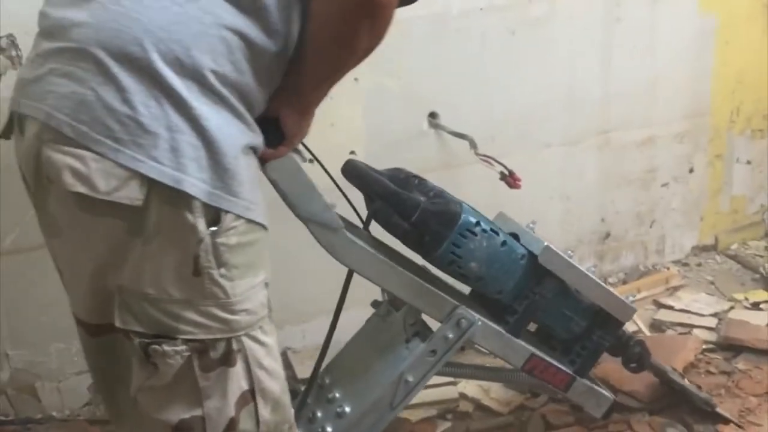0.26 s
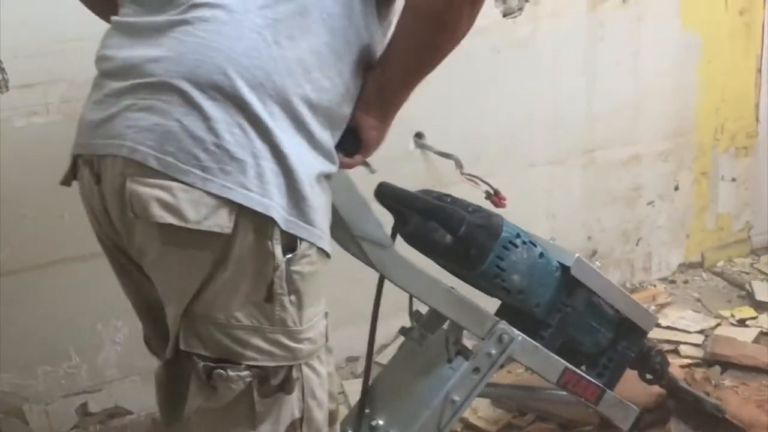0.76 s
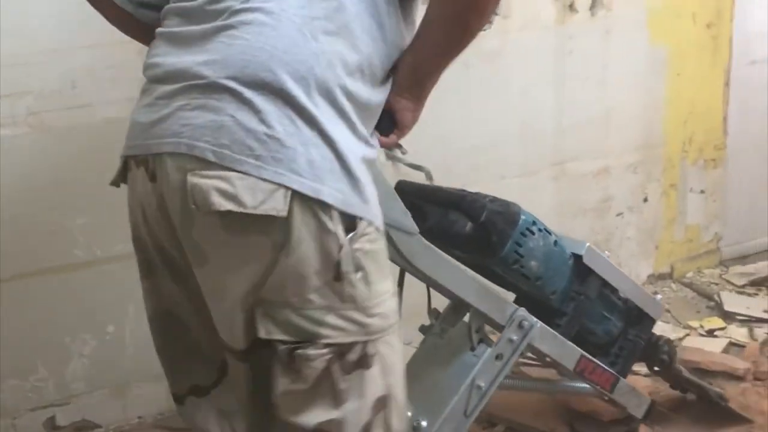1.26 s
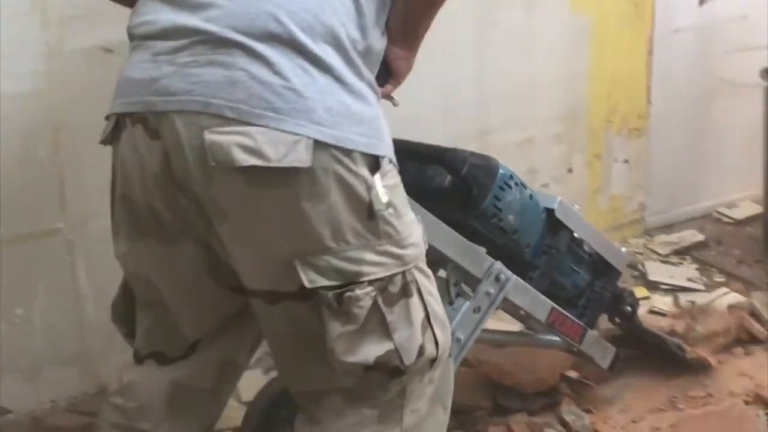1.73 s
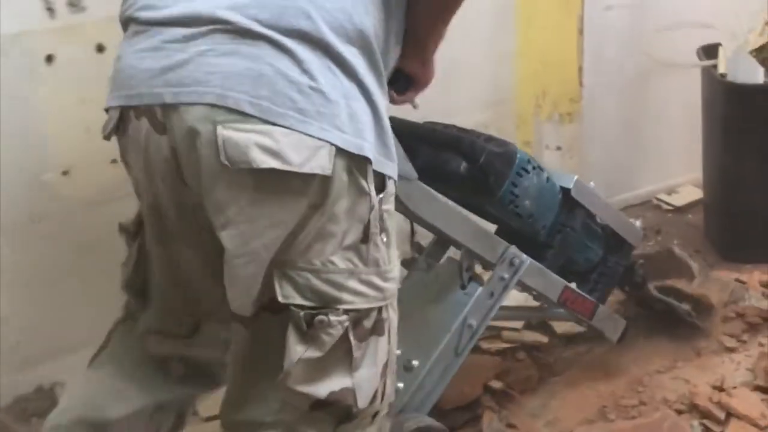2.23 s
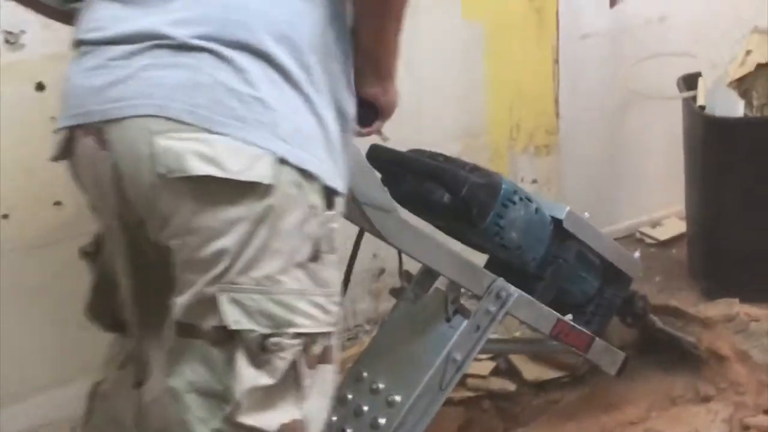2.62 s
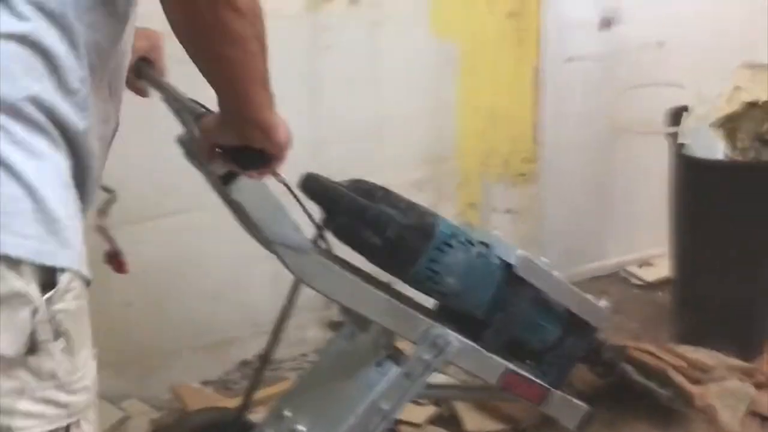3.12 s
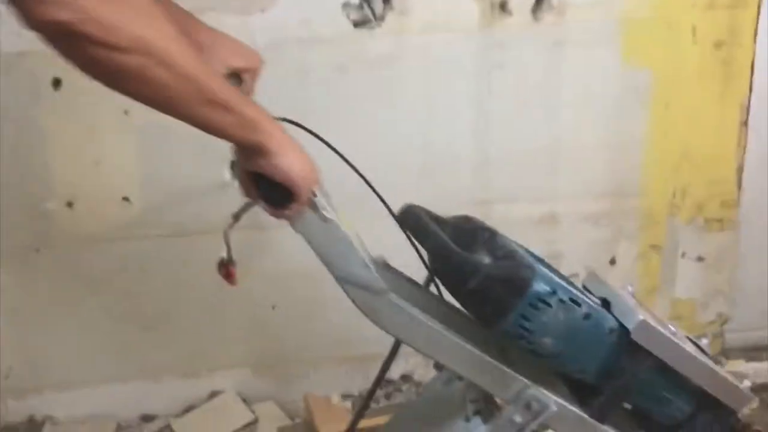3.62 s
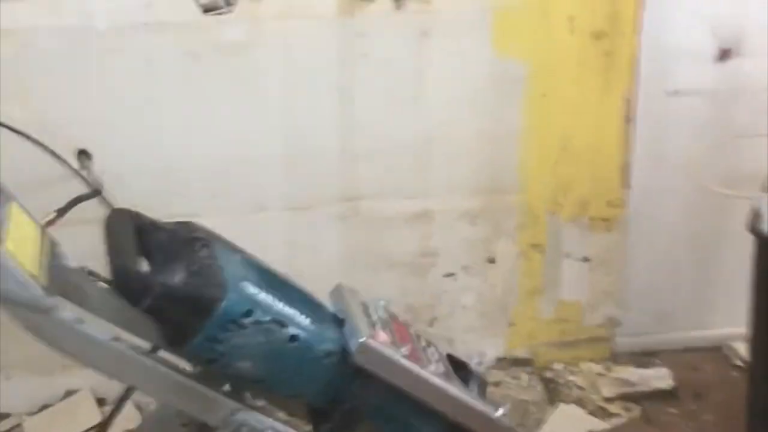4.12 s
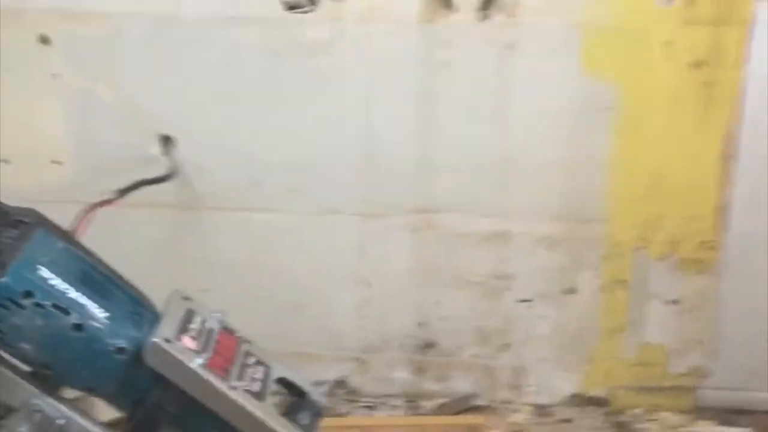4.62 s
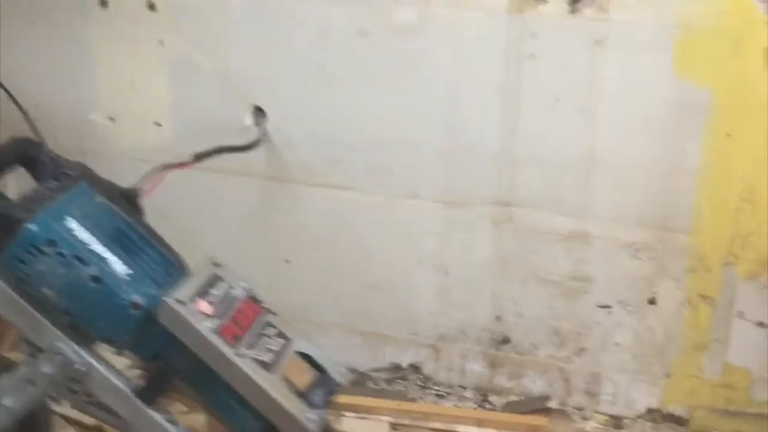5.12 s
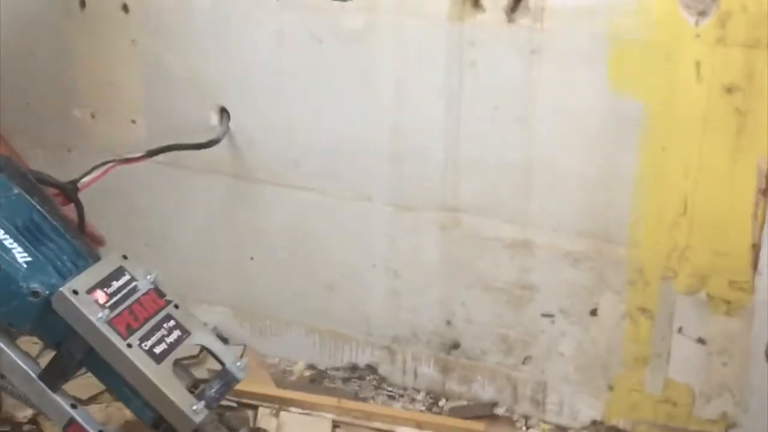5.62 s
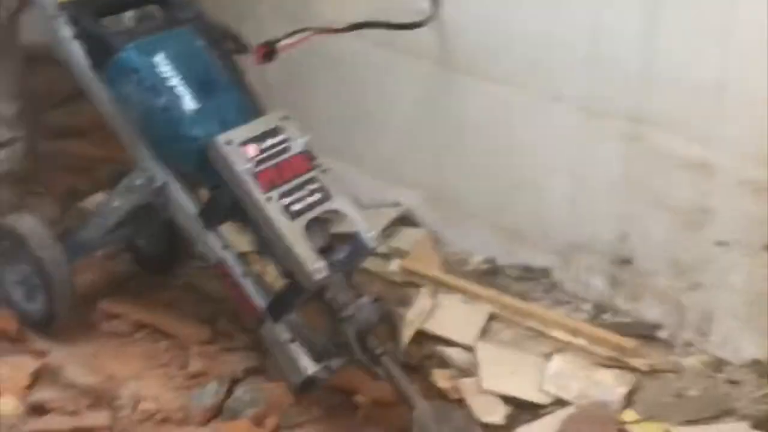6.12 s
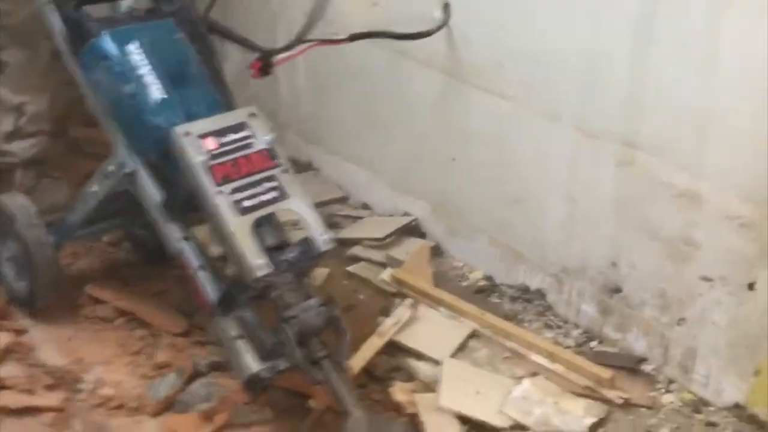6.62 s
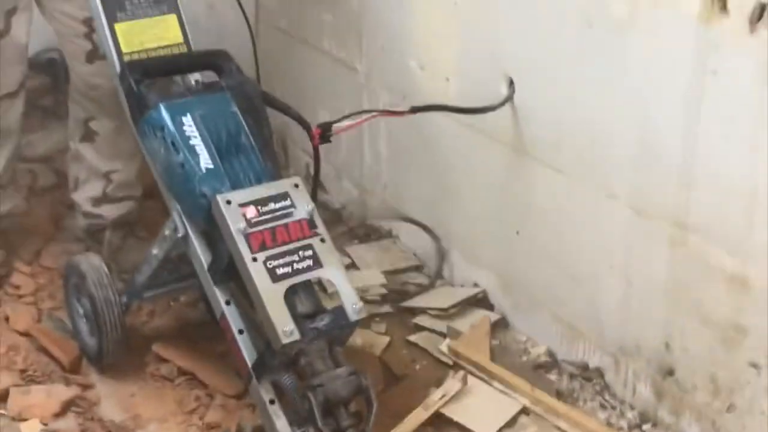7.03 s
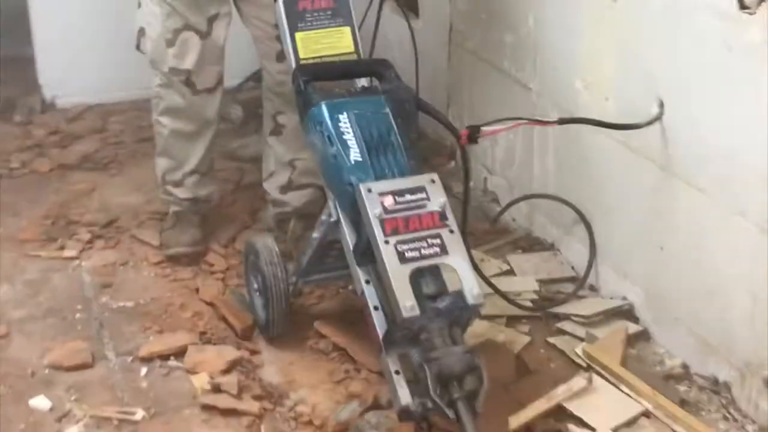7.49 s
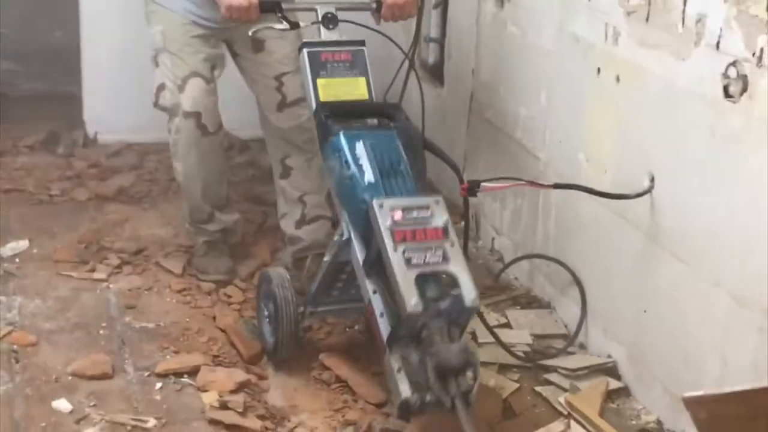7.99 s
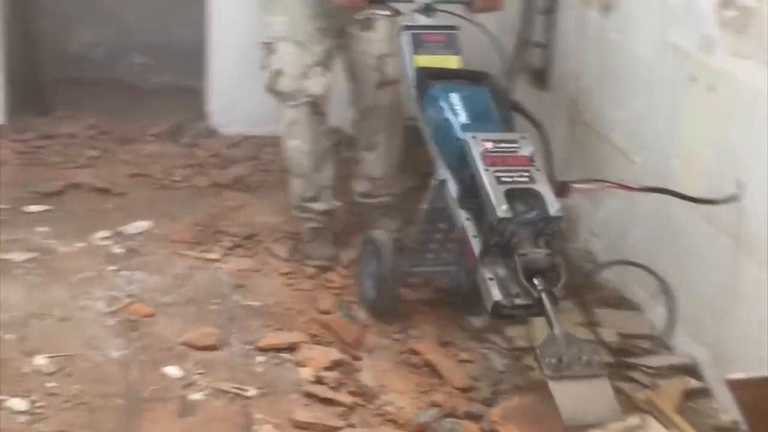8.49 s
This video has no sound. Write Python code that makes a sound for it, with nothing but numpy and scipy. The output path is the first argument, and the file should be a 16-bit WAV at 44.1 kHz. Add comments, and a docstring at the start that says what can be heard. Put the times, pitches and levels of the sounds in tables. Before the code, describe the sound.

Close, bright and echoing in a bare room, an electric demolition hammer on a cart is already running, its loose bit rattling at about 24 strokes a second under a high whine. Near 0.6 s a hard blow and splitting tile begin a hammering burst to 1.2 s; a brief wheel rumble passes beneath. Further bursts come at 1.3-1.5, 1.8-2.0, 2.1-2.9 and 3.1-3.3 s, sharp cracks with grit and slab knocks, the throbbing motor filling the gaps. Dull thumps fall at 1.9 and around 2.3-2.4 s. After a motor-only lull, loose rattle swells from 3.6 s to a steady metallic clatter by 4.3 s, with clanks mostly between 4.5 and 5.6 s, then 6.5 and 6.9 s. From 5.9 s scraping and blade ringing strengthen on bare slab. Whine and stroke rate sink slightly; faint wheels rumble from 7.7 s to the end, still running.

```python
"""A bare, ringing room, where an electric demolition hammer on a cart lifts floor tile.
While the chisel bites, about 24 blows a second excite the chisel and the slab; between these bursts the motor runs on.
When the blade rides loose over the rubble, each stroke throws the bit: it rattles, and cart, shank and blade resonate.
The motor's whine is locked to the crank and slowly sinks with it; a few dull thumps and a low wheel rumble pass.
Noise, contact grains and sinusoids pass through resonant bodies and, for most sources, decaying echoes."""
import sys
import numpy as np
from scipy import signal
from scipy.fft import rfft, irfft, next_fast_len
from scipy.io import wavfile
from scipy.ndimage import uniform_filter1d, minimum_filter1d

SR = 44100
rng = np.random.default_rng(int(sys.argv[2]) if len(sys.argv) > 2 else 0)


def waveform_to_disk(signal):
    """Save audio, clipped to [-1, 1], as 16-bit WAV at the path in sys.argv[1]."""
    frames = np.transpose(np.atleast_2d(signal))
    scaled = np.clip(frames, -1, 1) * 32767
    samples = np.round(scaled).astype(np.int16)
    wavfile.write(sys.argv[1], SR, samples)


N = 385875
TIME = np.arange(N) / SR   # s
SIZE = next_fast_len(N + SR)   # transform length, samples
HZ = np.maximum(np.arange(SIZE // 2 + 1) * SR / SIZE, 1)


# speed of the crank, which slackens as the blade is pushed along: t/s, strokes per second/Hz
STROKE_RATE = [(0.0, 23.72), (0.6, 23.62), (4.1, 24.02), (8.75, 23.19)]


def crank():
    """Phase is the integral of frequency: turns of the crank, and the time of each full turn in s."""
    turns = np.cumsum(curve(STROKE_RATE)) / SR
    strokes = TIME[1:][np.diff(np.floor(turns)) > 0]
    return turns, strokes


# bursts in which the chisel bites: first blow t/s, last blow t/s, lengthening of each stroke/s,
# relative crack level/dB, relative knock level/dB
BURSTS = [(0.618, 1.176, -0.0018, -15, -29), (1.341, 1.477, 0.0037, -11.5, -28),
          (1.758, 1.976, 0.0016, -13.3, -30.5), (2.088, 2.921, 0.00002, -15.5, -29.5),
          (3.118, 3.338, 0.0019, -15, -29.5)]
# the chisel seats itself over the first strokes of a burst and is eased off over the last
SEATING_DB, SEATING_STROKES, EASING_DB, EASING_STROKES = -4, 0.34, -4.5, 0.36
CRACK_UNEVEN_DB, KNOCK_UNEVEN_DB = 0.05, 1.5


def blows():
    """Periodic impact, one blow per stroke, weaker at both ends of a burst: rows (t/s, crack/dB, knock/dB)."""
    rows = []
    for first, last, slowing_s, crack_db, knock_db in BURSTS:
        rate = np.interp(first, *np.transpose(STROKE_RATE))
        gaps = int(round((last - first) * rate))
        k = np.arange(gaps + 1)
        s = np.linspace(first, last, gaps + 1) - slowing_s * k * (gaps - k) / 2
        seating_db = SEATING_DB * np.exp(-k / SEATING_STROKES)
        easing_db = EASING_DB * np.exp((k - gaps) / EASING_STROKES)
        force_db = seating_db + easing_db
        chance = rng.standard_normal((len(k), 2))
        cracks_db = crack_db + force_db + CRACK_UNEVEN_DB * chance[:, 0]
        knocks_db = knock_db + force_db + KNOCK_UNEVEN_DB * chance[:, 1]
        rows.append(np.transpose([s, cracks_db, knocks_db]))
    return np.vstack(rows)


# tile splits and crumbles under the blade: start t/s, end t/s, relative level/dB
SPLITS = [(0.614, 0.782, -15), (0.842, 1.307, -33), (1.705, 1.713, -27.5)]
SPLIT_RISE_DB_PER_S, SPLIT_FALL_DB_PER_S = 4000, 430
# broad spectra of the crack and of the slab: f/Hz, relative level/dB
CRACK_COLOUR = [(300, -39), (900, -16), (1500, -4.5), (2200, -3.5), (3200, 0), (4300, -1.5), (5700, 0),
                (7000, -4), (8800, -9), (10500, -11), (13000, -10), (15500, -17.5)]
SLAB_COLOUR = [(30, -29), (60, -19), (110, -20.5), (200, -11), (300, -3), (430, -11.5), (620, 3), (1000, 4),
               (1250, -9.5), (2000, -30)]
# resonances of the chisel pressed into the floor: f/Hz, width/Hz, lift/dB
PRESSED_CHISEL = [(1313, 46, 7.5), (1890, 120, 4), (3110, 280, 3.5), (4290, 200, 3.5), (4630, 170, 5.5),
                  (7810, 240, 6), (9650, 280, 7.5), (11440, 180, 9.5)]
# modes of the shank, a little higher when pressed into the floor: f/Hz, width/Hz, relative level/dB
PRESSED_SHANK = [(4800, 100, -8.5), (4780, 32, -4), (4880, 16, -13), (7520, 49, -16)]


def biting(tails):
    """Impact excitation: each blow is a crack and a spray of grit in the chisel, and a knock in the slab."""
    s, steel_db, slab_db = blows().T
    crack = from_db(8) * decays(s, from_db(steel_db), t60=0.029, attack_s=0.0013)
    crack = crack * rng.standard_normal(N)
    crack = signal.lfilter([1, -.4], [1], crack)   # tilted towards the treble
    grit = from_db(3.0) * decays(s, from_db(steel_db), t60=0.086, attack_s=0.00059)
    grit = grit * grains(per_s=9000, spread_db=4)
    crumble = swells(SPLITS, SPLIT_RISE_DB_PER_S, SPLIT_FALL_DB_PER_S) * grains(per_s=12000, spread_db=2.5)
    knock = from_db(8.5) * decays(s, from_db(slab_db), t60=0.081, attack_s=0.0043)
    knock = knock * rng.standard_normal(N)
    steel = in_room(body(crack + grit + crumble, CRACK_COLOUR, PRESSED_CHISEL), tails, wet_db=0.5)
    shank = in_room(ringing(crack + grit + 0.29 * crumble, PRESSED_SHANK), tails, wet_db=6.0)
    slab = in_room(body(knock + from_db(-11.5) * crumble, SLAB_COLOUR), tails, wet_db=3.0)
    return steel + from_db(-10.5) * shank + slab


def chatter(strokes, rebound_s, t60, loose_db, uneven_db):
    """Repeated impact: each stroke throws the loose bit forward; it rebounds and jitters until the next."""
    chance = rng.standard_normal((len(strokes), 4))
    hit_s = strokes + 0.0014 * chance[:, 0]
    hits = decays(hit_s, from_db(uneven_db * chance[:, 1]), t60, attack_s=0.0022)
    rebound_at = strokes + rebound_s + 0.0019 * chance[:, 2]
    rebounds = decays(rebound_at, from_db(-6.5 + uneven_db * chance[:, 3]), t60, attack_s=0.0019)
    jitter = grains(per_s=1800, spread_db=2.5)
    jitter = signal.lfilter([.6], [1, -.4], jitter)   # light touches are duller than strokes
    return (hits + rebounds) * grains(per_s=8000, spread_db=2.5) + from_db(loose_db) * jitter


# how hard the loose bit is shaken over the rubble: t/s, relative level/dB
SHAKING = [(0.0, 0), (0.3, 0), (0.6, 1.5), (3.6, -14), (3.9, -5.5), (4.2, -0.95), (4.9, 0.56), (6.4, 0.03),
           (8.75, -0.5)]
# a lone blow on the floor at 0.569 s, then the bit clanks hard against its holder: t/s, relative level/dB
CLANKS = [(0.569, 3), (4.5163, -6), (4.6399, -12), (4.6874, 0.5), (5.1415, -3), (5.3966, -1), (5.5232, -2),
          (5.5699, 0), (6.4992, -2), (6.9231, -5)]
# the blade skips and rings out: t/s, relative level/dB
BLADE_RINGS = [(3.92, -29.5), (4.13, -36), (4.36, -44), (5.75, -26.5), (5.99, -25.5), (6.23, -23.5),
               (6.52, -20.5), (7.19, -24.5), (7.61, -23), (7.84, -20.5), (8.09, -25), (8.36, -21.5),
               (8.54, -22)]
RING_RISE_DB_PER_S, RING_HOLD_S, RING_FALL_DB_PER_S = 246, 0.014, 104
# broad spectra of the rattling bit and of the cart: f/Hz, relative level/dB
RATTLE_COLOUR = [(500, -30), (1100, -6.5), (1600, -3.5), (2400, -1.5), (3300, 3.5), (3900, -1.5),
                 (4500, 3.5), (5000, -3), (6000, -1.5), (7300, -10.5), (8700, -5), (10500, -15),
                 (11800, -11), (15500, -22.5)]
CART_COLOUR = [(30, -18), (50, -16), (100, -14.5), (170, -12), (330, -7.5), (480, -4), (680, 1), (900, 2.5),
               (1200, -8.5), (2000, -26)]
# resonances of the loose chisel and of the cart's frame: f/Hz, width/Hz, lift/dB
LOOSE_CHISEL = [(1958, 36, 6.4), (2220, 54, 3.8), (3135, 37, 5.6), (7740, 110, 4.4), (8380, 90, 2.6)]
CART_FRAME = [(61, 4.9, 8), (202, 9.2, 2.7), (245, 7.5, 1.6), (357, 26, 4.7), (835, 17, 4.7)]
# modes of the shank, the blade and its edge: f/Hz, width/Hz, relative level/dB
SHANK = [(4620, 17, -2.3), (4634, 12, 0.84)]
BLADE = [(1355, 9.4, 5.5)]
EDGE = [(1043, 57, -3), (1106, 13.6, 9.5), (1200, 210, -5), (1289, 35, 6)]
# levels at 0 dB of shaking
RATTLE_DB, CART_DB, SHANK_DB, BLADE_DB = -22.0, -32, -32.5, -36
CART_FOLLOWS = 1.2   # dB of cart clatter per dB of shaking
# the edge scrapes softly over rubble, then reaches bare slab, where the blade rings more
SLAB_REACHED_S, SLAB_ONSET_S = 5.87, 0.12
EDGE_ON_RUBBLE_DB, EDGE_ON_SLAB_DB, BLADE_ON_SLAB_LIFT_DB = -36, -27.5, 4.5


def riding(strokes, tails):
    """Forced vibration: the loose bit rattles, shakes the cart and keeps its shank and blade ringing."""
    shaking_db = curve(SHAKING)
    shake = chatter(strokes, rebound_s=0.02086, t60=0.054, loose_db=-9.5, uneven_db=1.5)
    clank_s, clank_db = np.transpose(CLANKS)
    clanks = from_db(-11.5) * decays(clank_s, from_db(clank_db), t60=.025) * rng.standard_normal(N)
    on_slab = np.clip((TIME - SLAB_REACHED_S) / SLAB_ONSET_S, 0, 1)

    rattle = from_db(RATTLE_DB + shaking_db) * evened(shake, window_s=0.305)
    bit = in_room(body(rattle + clanks, RATTLE_COLOUR, LOOSE_CHISEL), tails, wet_db=-0.4)

    cart = in_room(body(shake, CART_COLOUR, CART_FRAME), tails, wet_db=3)
    cart = from_db(CART_DB + CART_FOLLOWS * shaking_db) * evened(cart, window_s=0.071)

    shank = in_room(ringing(shake, SHANK), tails, wet_db=3.5)
    shank = from_db(SHANK_DB + shaking_db) * evened(shank, window_s=0.39)

    skips = [(at, at + RING_HOLD_S, db) for at, db in BLADE_RINGS]
    rings = swells(skips, RING_RISE_DB_PER_S, RING_FALL_DB_PER_S)
    blade_db = BLADE_DB + BLADE_ON_SLAB_LIFT_DB * on_slab + shaking_db
    blade = in_room(ringing(shake, BLADE), tails, wet_db=-3.5)
    blade = np.hypot(from_db(blade_db), rings) * evened(blade, window_s=0.075)

    edge_db = EDGE_ON_RUBBLE_DB * (1 - on_slab) + EDGE_ON_SLAB_DB * on_slab
    edge = in_room(ringing(shake, EDGE), tails, wet_db=-0.5)
    edge = from_db(edge_db + shaking_db) * evened(edge, window_s=0.16)
    return lifted() * (bit + cart + shank + blade + edge)


def lifted():
    """Contact condition: 1 while the blade rides loose, 0 while the chisel is pressed in."""
    return np.interp(TIME, [.58, .8, 3.45, 3.85], [1, 0, 0, 1])


# broad spectrum of fan and gears: f/Hz, relative level/dB
MOTOR_COLOUR = [(30, -22), (60, -23), (110, -29), (250, -11), (480, -7), (700, -1), (1300, -0.5),
                (1700, -5), (3300, 2), (4800, -3.5), (7000, -3.5), (9500, -9.5), (15500, -25)]
# hums of the drive, and a low hum of the cart near 63 Hz: f/stroke rate, relative level/dB
HUMS = [(2.66, -58.5), (5, -60.5), (7, -57), (9, -62), (11, -52.5)]
# gain of the hums, strong at first, faint in the middle, strong again towards the end: t/s, level/dB
HUM_LEVEL = [(1.1, 5), (1.6, -9), (3.6, -12), (4.3, -7), (6.5, 3.5), (8.5, 2.5)]
# whine of the motor, with side tones from the crank: f/stroke rate, relative level/dB
WHINE = [(194, -6), (195, 1.5), (196, -8.5)]
# level of the whine before the shaking is added, heard while the tool rides free: t/s, level/dB
WHINE_LEVEL = [(0.05, -22.5), (0.28, -33.5), (0.5, -29), (4.0, -33), (4.7, -28), (5.35, -28), (5.65, -21),
               (5.9, -33), (7.0, -29.5), (8.75, -38)]


def motor(turns, tails, waver_db=2.5, waver_cycles=0.12):
    """Amplitude modulation and frequency ratios: the rush throbs with the crank; hums and whine track it."""
    throb = 1 + 0.52 * np.cos(2 * np.pi * turns)
    rush = grains(per_s=5000, spread_db=2.0) * throb
    gears = in_room(body(rush, MOTOR_COLOUR, [(1340, 40, 3.7), (4740, 150, 12.0)]), tails, wet_db=2.5)
    hum = sum(from_db(db) * np.sin(2 * np.pi * (order * turns + rng.random())) for order, db in HUMS)
    whine = np.zeros(N)
    for order, db in WHINE:
        gain = from_db(db + waver_db * drift(per_s=3.2))
        cycles = round(order) * turns + waver_cycles * drift(per_s=3.2)
        whine += gain * np.sin(2 * np.pi * cycles)
    whine_db = curve(WHINE_LEVEL) + curve(SHAKING)
    whine = lifted() * from_db(whine_db) * rms_one(whine)
    return from_db(-34) * gears + from_db(curve(HUM_LEVEL)) * hum + whine


# dull thumps: t/s, nominal peak level/dB
THUMPS = [(1.886, -25), (2.256, -25), (2.298, -23), (2.424, -19.5)]


def thumps(start_hz=720, end_hz=45, fall_s=0.0025, t60=0.075):
    """Damped oscillation of falling frequency: each thump is a quick swing that slows as it dies."""
    out = np.zeros(N)
    for s, peak_db in THUMPS:
        age = np.maximum(TIME - s, 0)
        cycles = end_hz * age + (start_hz - end_hz) * fall_s * (1 - np.exp(-age / fall_s))
        swing = np.minimum(age / .001, 1) * from_db(-60 * np.minimum(age / t60, 3))
        out += from_db(peak_db) * swing * np.sin(2 * np.pi * cycles)
    return out


# the cart is shoved forward: start t/s, end t/s, level/dB
SHOVES = [(0.76, 0.838, -47), (7.7, 8.75, -53.5)]
SHOVE_RISE_DB_PER_S, SHOVE_FALL_DB_PER_S, RUMBLE_HZ, RUMBLE_WIDTH_HZ = 150, 120, 56, 28


def wheels():
    """Rolling noise: a resonance driven at random rumbles for as long as each shove lasts."""
    rumble = through(rng.standard_normal(N), resonance(RUMBLE_HZ, RUMBLE_WIDTH_HZ))
    return swells(SHOVES, SHOVE_RISE_DB_PER_S, SHOVE_FALL_DB_PER_S) * rumble


# reverberation time of the room: f/Hz, t60/s
ROOM_T60 = [(100, 1), (500, 0.67), (2000, 0.77), (5000, 0.68), (10000, 0.48), (16000, 0.34)]


def room_tails(first_echo_s=.004, count=17):
    """Reverberant decay off bare plaster, shortest in the high treble; one pattern for each spot of the tool."""
    t, tails = TIME[:SR // 2], 0
    edges = np.geomspace(30, 17000, 12)   # Hz
    for low, high in zip(edges, edges[1:]):
        band_pass = signal.butter(2, [low, high], "band", fs=SR, output="sos")
        band = signal.sosfilt(band_pass, rng.standard_normal((count, len(t))))
        tails = tails + band * from_db(-60 * t / at_hz(ROOM_T60, np.sqrt(low * high)))
    tails = tails * (t > first_echo_s)
    return tails / np.sqrt(np.sum(tails ** 2, axis=1, keepdims=True))


def in_room(x, tails, wet_db, size=6144):
    """Convolution with the room: echoes change pattern as the tool moves and join the direct sound by power."""
    echoes, wet, lead = np.zeros(N + 2 * SR), from_db(wet_db), 2 * size
    running = np.pad(x, (lead, 0), "reflect")   # the room is already ringing at the start
    span = next_fast_len(size + tails.shape[1])
    spots = rfft(tails, span)
    for k, i in enumerate(range(0, len(running), size // 2)):
        piece = running[i:i + size]
        piece = piece * np.sin(np.pi * np.arange(len(piece)) / size)
        echoes[i:i + span] += irfft(rfft(piece, span) * spots[k % len(spots)], span)
    return (x + wet * echoes[lead:lead + N]) / np.sqrt(1 + wet ** 2)


def body(x, colour, modes=()):
    """Source and filter: a broad colour that falls away past its ends, lifted at each resonance."""
    ends = (1 + (colour[0][0] / HZ) ** 2) * (1 + (HZ / colour[-1][0] / 2) ** 4)
    response = from_db(at_hz(colour, HZ)) / ends
    for hz, width, lift_db in modes:
        response = response * (1 + (from_db(lift_db) - 1) * resonance(hz, width))
    return through(x, response)


def ringing(x, modes):
    """Modal superposition: steel struck by x rings in its modes, with alternating sign."""
    response = 0
    for k, (hz, width, db) in enumerate(modes):
        response = response + from_db(db) * resonance(hz, width) * (-1) ** k
    return through(x, response)


def resonance(hz, width):
    """Damped harmonic oscillator: the response of one mode, 1 on top."""
    return 1 / (1 + 1j * (HZ ** 2 - hz ** 2) / (HZ * width))


def through(x, response):
    """Linear filtering by a response that keeps the power of white noise."""
    power = np.mean(abs(response) ** 2)
    return irfft(rfft(x, SIZE) * response / np.sqrt(power), SIZE)[:N]


def grains(per_s, spread_db):
    """Random point process: tiny contacts at random moments, of uneven size, at unit rms."""
    sizes = from_db(spread_db * np.clip(rng.standard_normal(N), -2, 2)) * rng.choice([-1, 1], N)
    return rms_one(sizes * (rng.random(N) < per_s / SR))


def decays(times, gains, t60, attack_s=0.00088):
    """Exponential energy decay: an envelope that swells at each contact and dies away."""
    kicks = np.zeros(N)
    samples = np.clip((np.asarray(times) * SR).astype(int), 0, N - 1)
    np.add.at(kicks, samples, np.square(gains))
    power = signal.lfilter([1], [1, -from_db(-60 / (t60 * SR)) ** 2], kicks + 1e-18)
    lag = np.exp(-1 / (attack_s * SR))
    return np.sqrt(signal.lfilter([1 - lag], [1, -lag], power))


def swells(rows, rise_db_per_s, fall_db_per_s):
    """Attack, hold and release, straight in level: the summed gain of rows (start t/s, end t/s, level/dB)."""
    total = np.zeros(N)
    for start, end, db in rows:
        below_db = rise_db_per_s * np.maximum(start - TIME, 0) + fall_db_per_s * np.maximum(TIME - end, 0)
        total += from_db(db - np.minimum(below_db, 120))
    return total


def drift(per_s):
    """Low-passed noise: a slow wander of unit rms."""
    knots = rng.standard_normal(int(N / SR * 40) + 400)   # 40 a second
    r = np.exp(-2 * np.pi * per_s / 40)
    slow = rms_one(signal.lfilter([1], [1, -2 * r, r * r], knots)[300:])
    return np.interp(TIME * 40, np.arange(len(slow)), slow)


def evened(x, window_s):
    """Power normalisation: hold the slow level at 1 and leave the fast flutter."""
    return x / np.sqrt(np.maximum(uniform_filter1d(x ** 2, int(window_s * SR)), 1e-12))


def rms_one(x):
    """Mean power: scale to unit rms."""
    return x / np.sqrt(np.mean(x ** 2) + 1e-20)


def from_db(db):
    """Logarithmic level: decibels to amplitude gain."""
    return 10 ** (np.asarray(db) / 20)


def curve(rows):
    """Linear interpolation of (t/s, value) rows at every sample."""
    return np.interp(TIME, *np.transpose(rows))


def at_hz(points, hz):
    """Logarithmic pitch: read a table on a log-frequency axis."""
    freqs, values = np.transpose(points)
    return np.interp(np.log(hz), np.log(freqs), values)


def scene():
    """Superposition: the crank times the strokes, and all sources add at one spot."""
    turns, strokes = crank()
    tails = room_tails()
    mono = biting(tails) + riding(strokes, tails) + motor(turns, tails) + thumps() + wheels()
    return np.array([mono, mono])


def record(dry, ceiling_db=1.0, release_db_per_s=120, cutoff_hz=15900):
    """Peak limiting and low-pass filtering: the loudest peaks are held down and the top is cut."""
    over = np.maximum(20 * np.log10(abs(dry[0]) + 1e-9) - ceiling_db, 0)
    held = np.maximum.accumulate(over + release_db_per_s * TIME) - release_db_per_s * TIME
    gain_db = uniform_filter1d(minimum_filter1d(-held, size=65), size=65)
    cut = signal.ellip(12, .1, 90, cutoff_hz, fs=SR, output="sos")
    return signal.sosfilt(cut, dry * from_db(gain_db))


dry = scene()
out = record(dry)
waveform_to_disk(out)
```